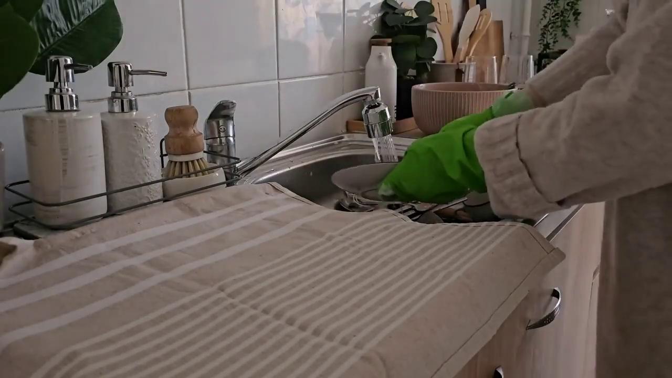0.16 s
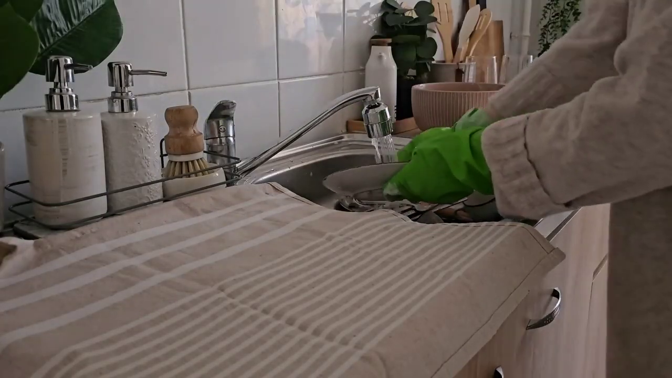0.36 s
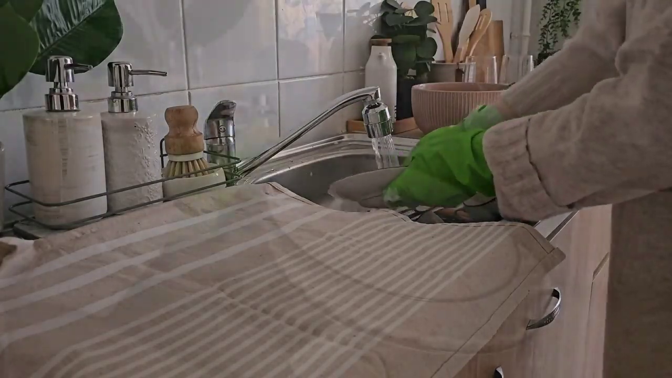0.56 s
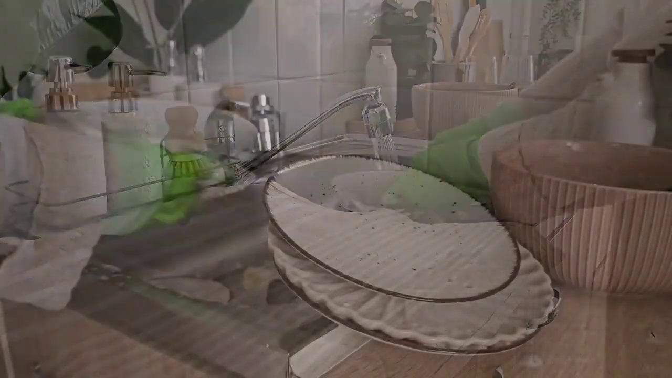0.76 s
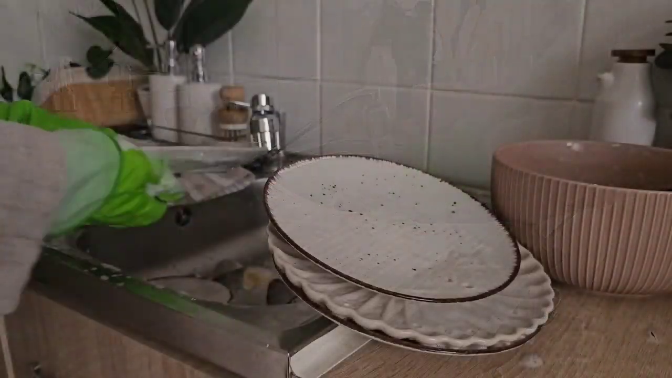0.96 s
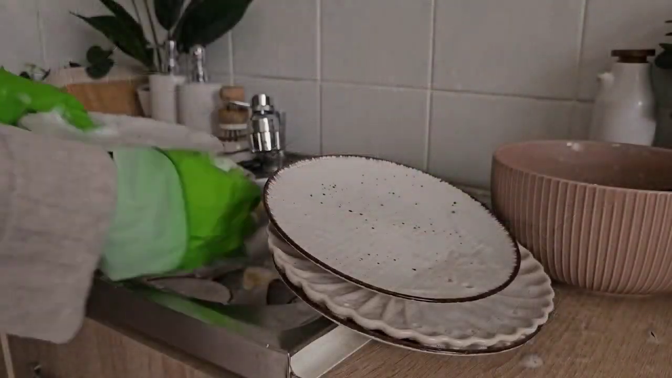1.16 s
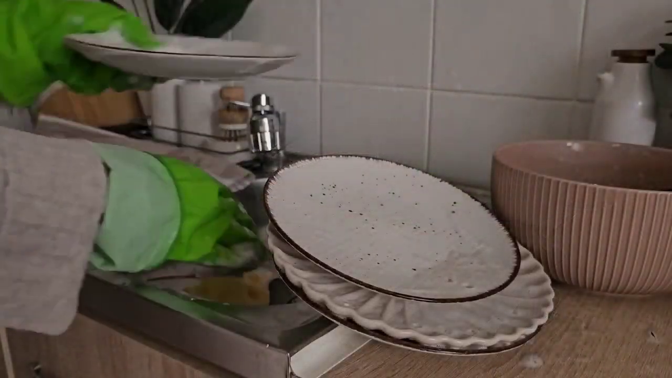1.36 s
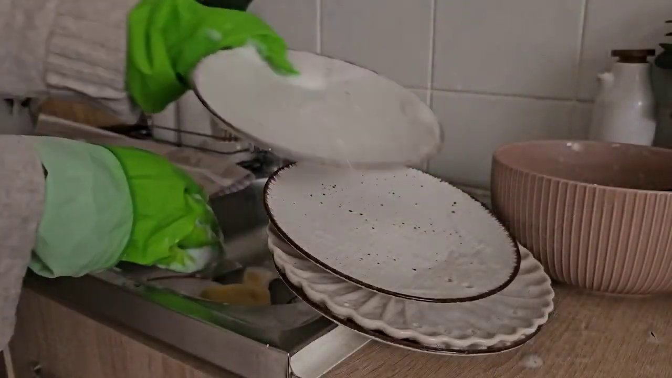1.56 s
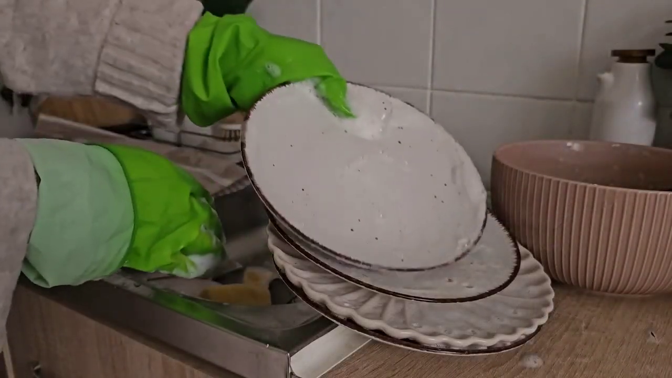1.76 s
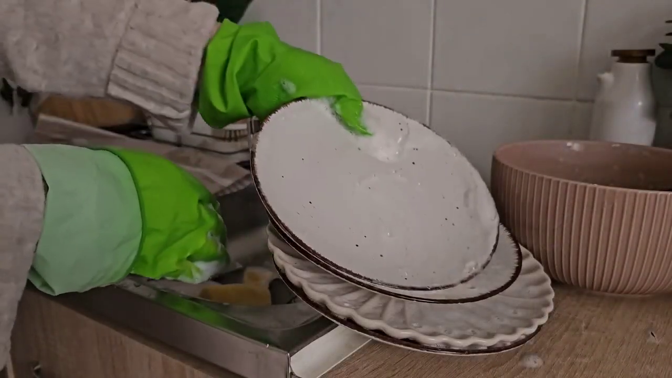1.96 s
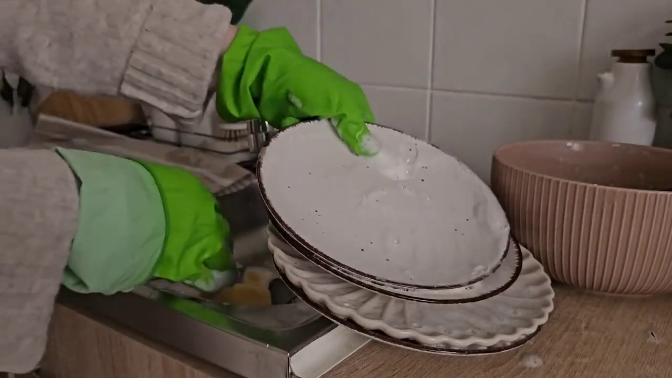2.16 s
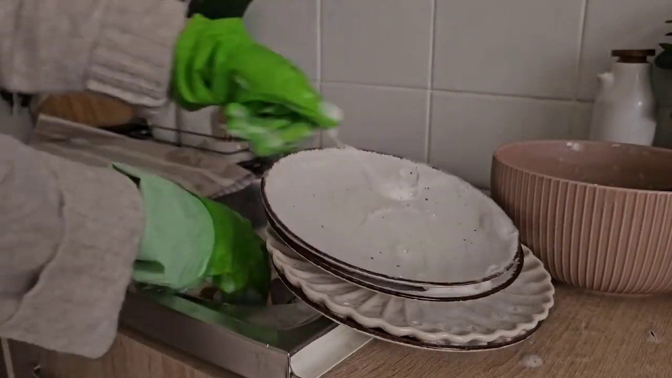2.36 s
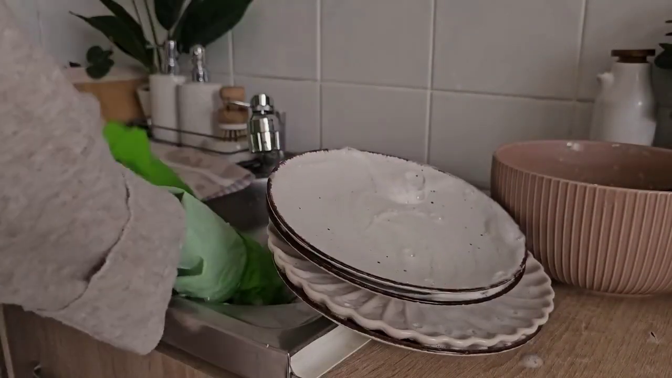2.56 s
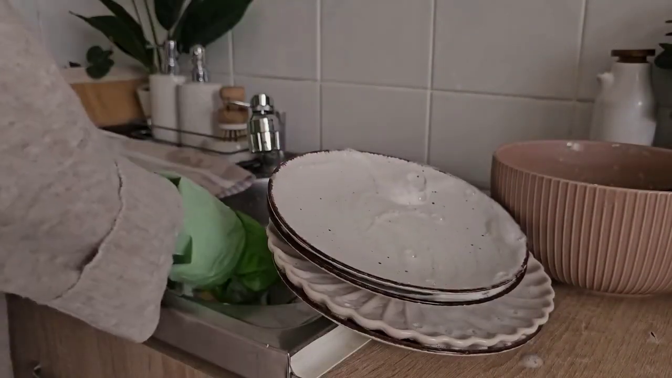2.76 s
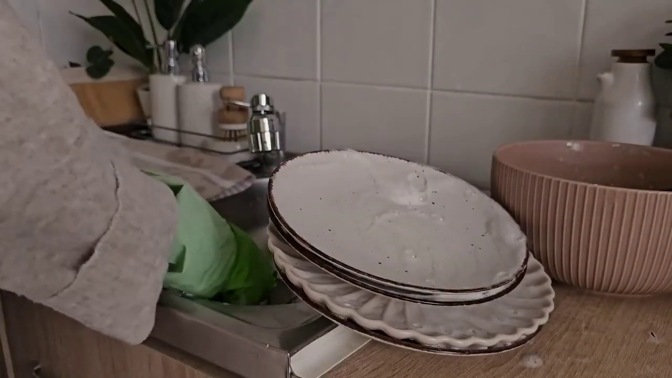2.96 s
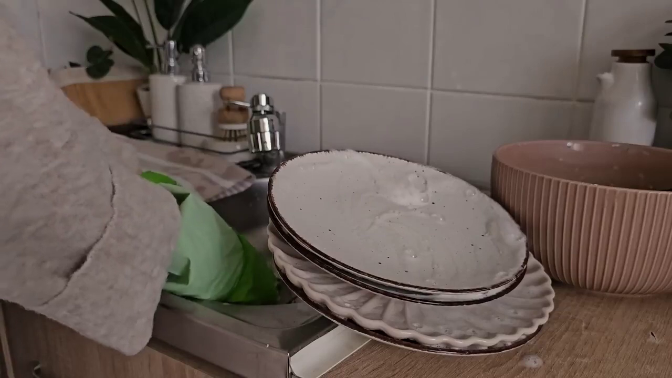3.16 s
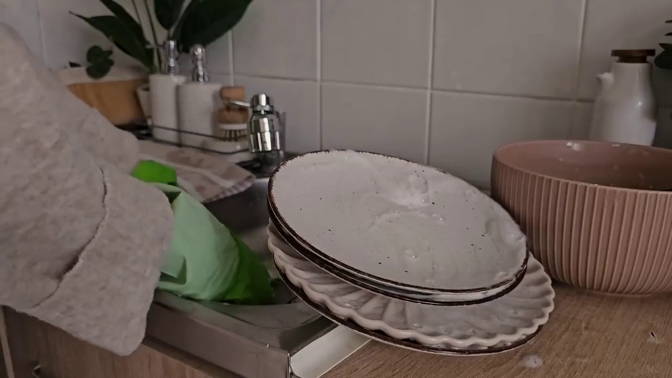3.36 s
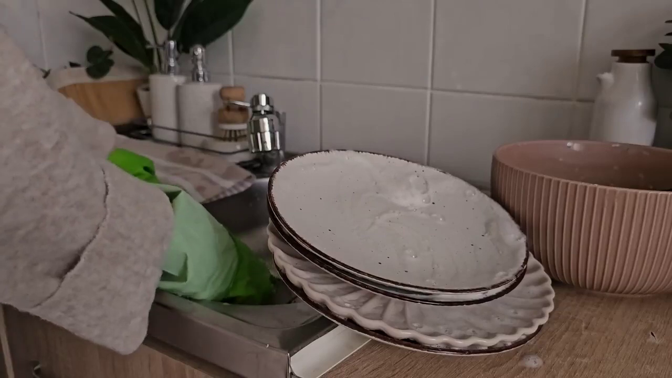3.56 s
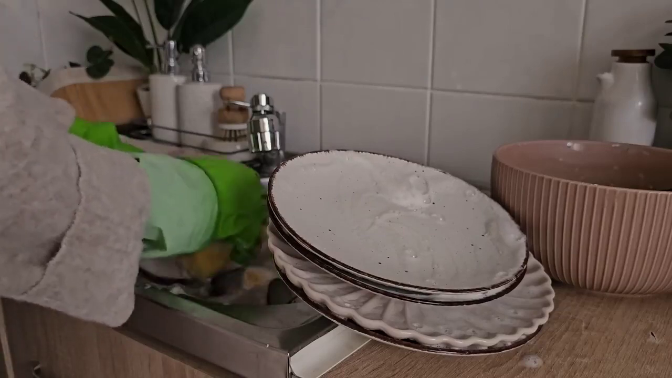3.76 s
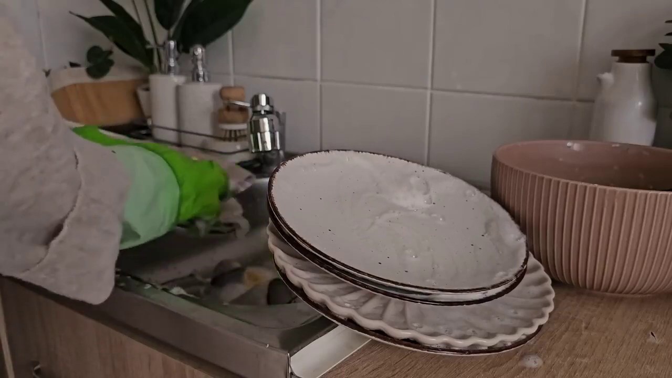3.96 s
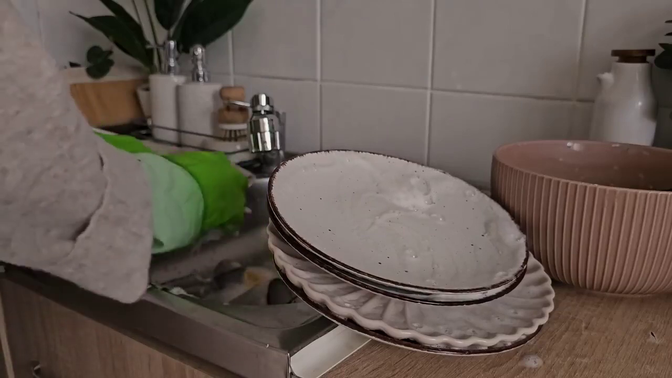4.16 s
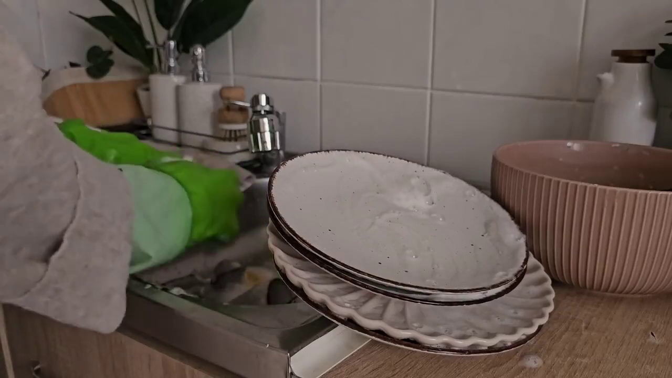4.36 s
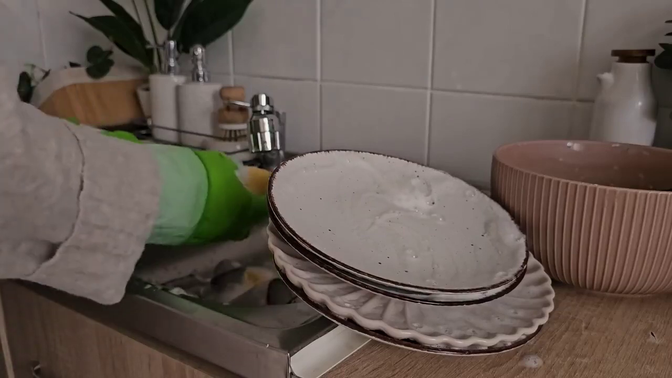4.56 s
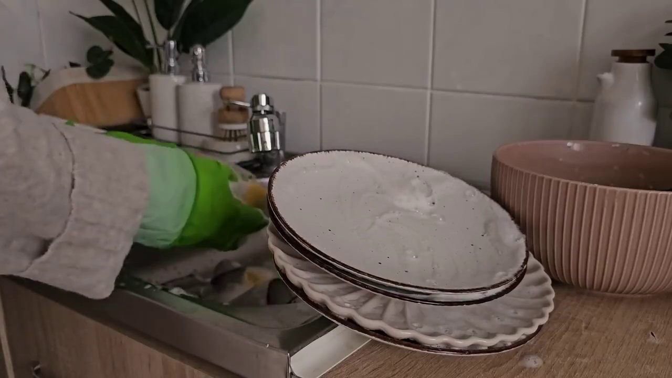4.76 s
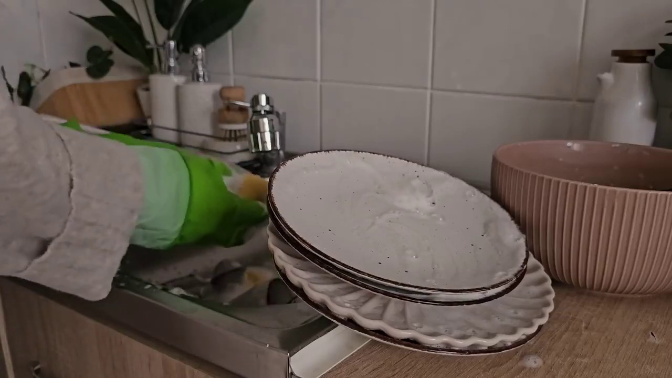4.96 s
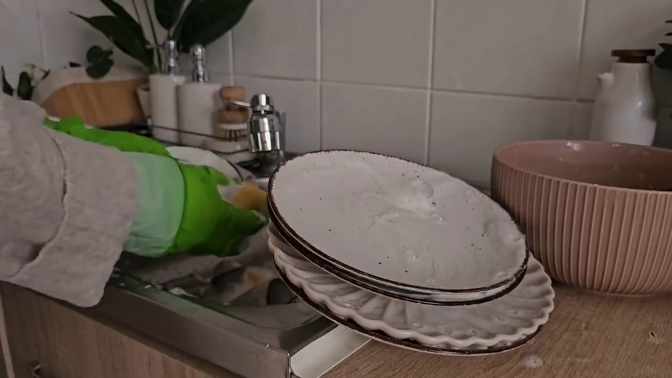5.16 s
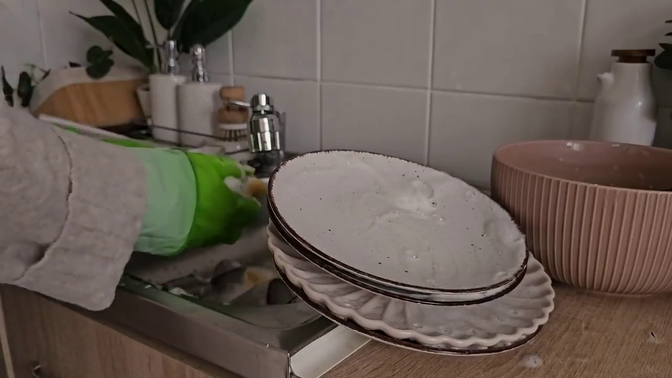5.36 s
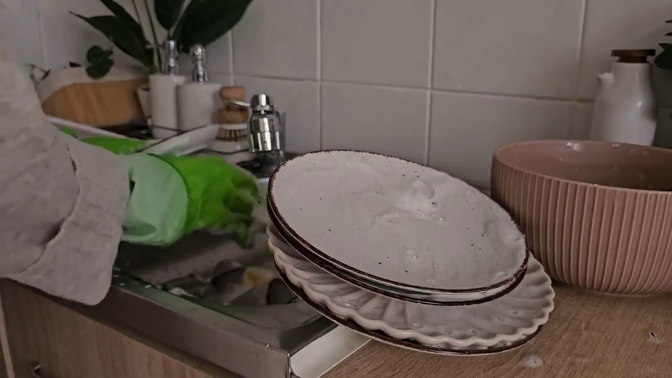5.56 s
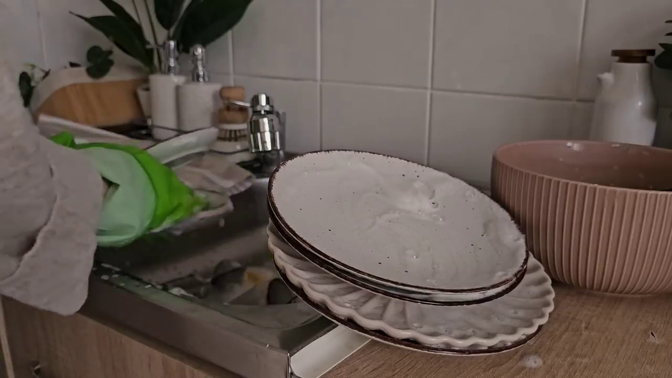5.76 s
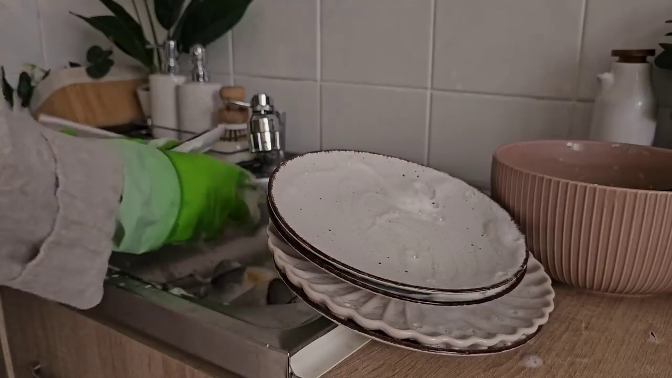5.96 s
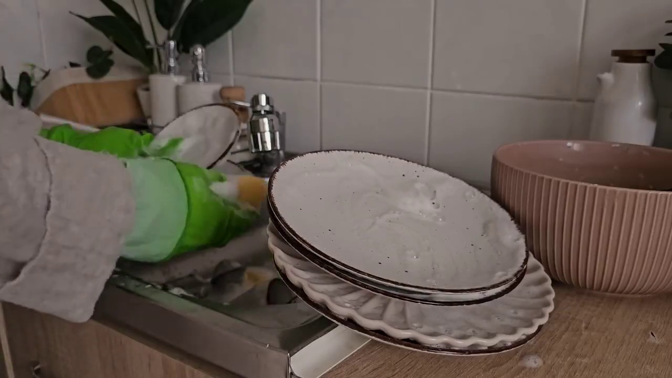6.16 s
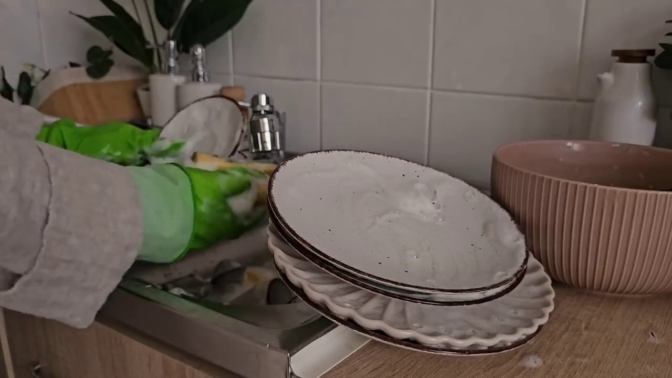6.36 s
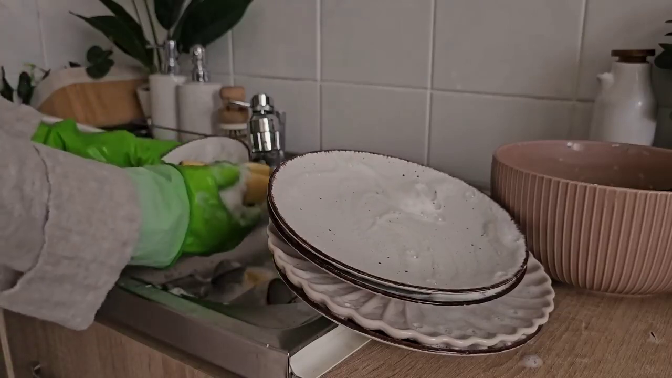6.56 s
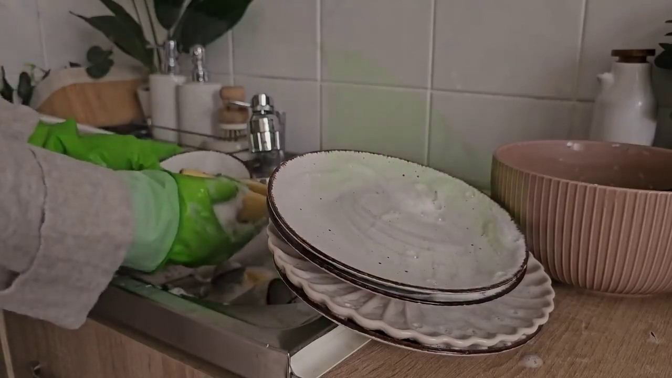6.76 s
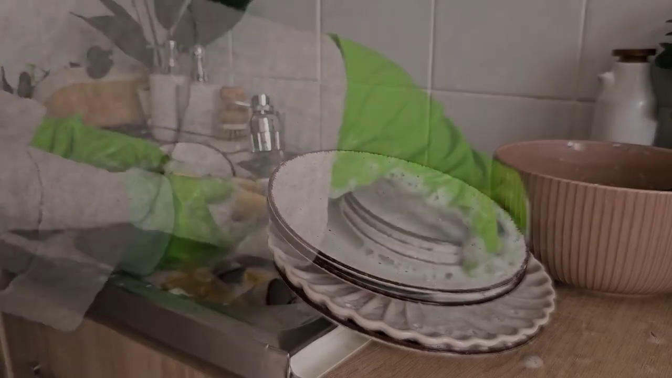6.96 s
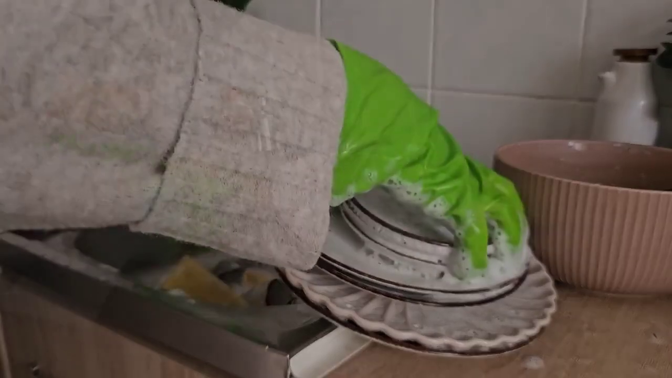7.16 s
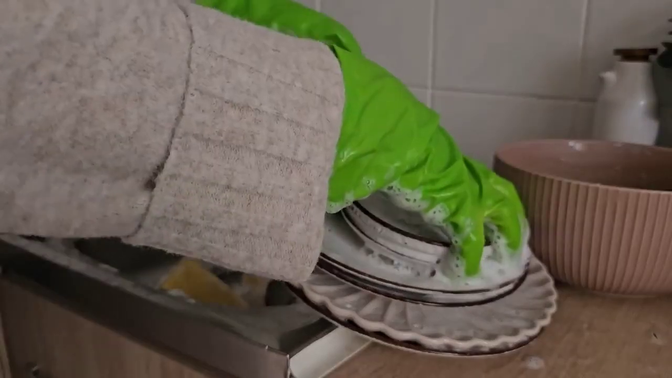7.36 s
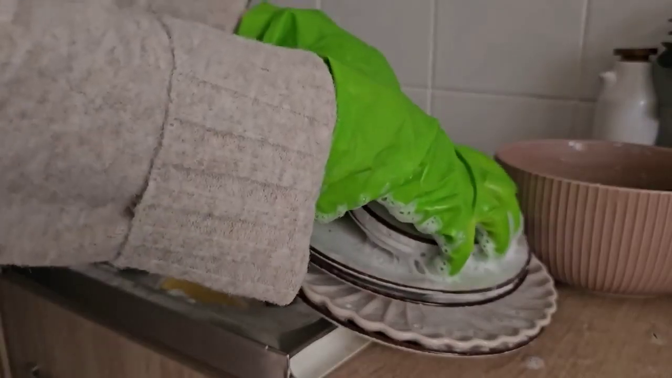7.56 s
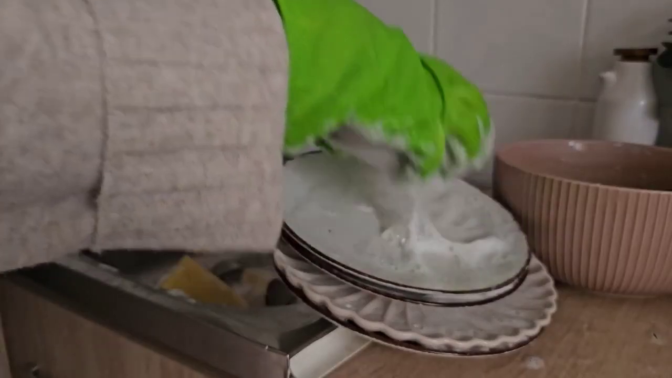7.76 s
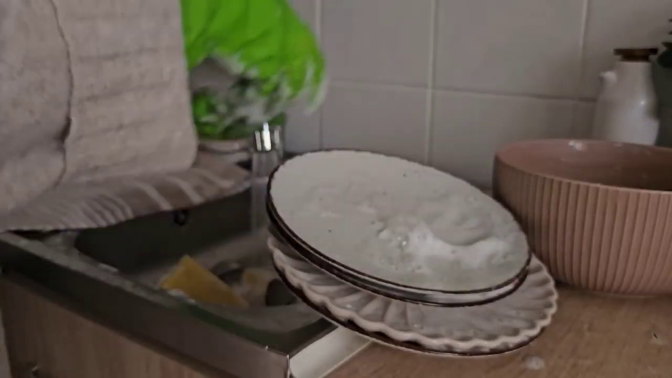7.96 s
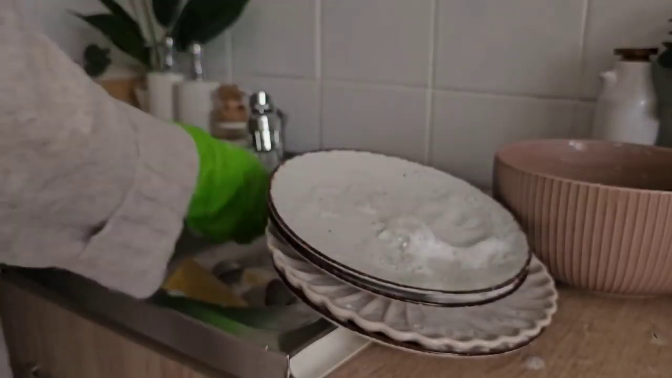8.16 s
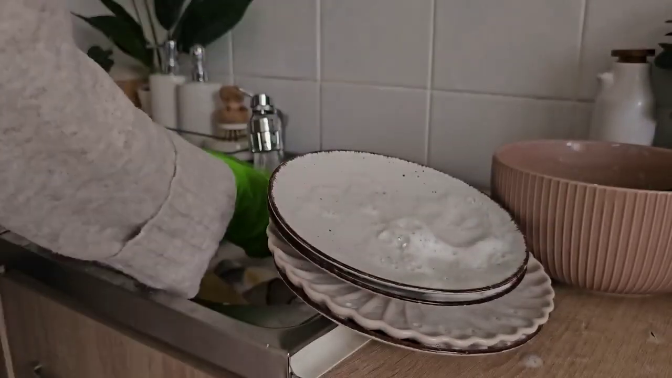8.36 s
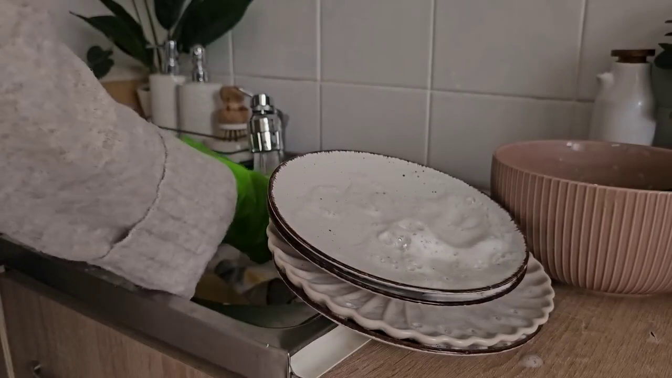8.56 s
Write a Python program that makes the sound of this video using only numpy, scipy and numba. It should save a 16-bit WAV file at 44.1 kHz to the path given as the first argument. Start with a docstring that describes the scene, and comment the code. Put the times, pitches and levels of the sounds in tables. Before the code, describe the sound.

Dishwashing by hand at a steel basin, heard close with a short tiled-room echo. Water swishes gently under sponge strokes. Two hard ceramic impacts boom through the worktop early on, then smaller, ringing dish clinks. A near-quiet stretch holds faint taps and a short glove squeak. A saucer clinks brightly and knocks softly several times; swelling suds, rubbing and a few rising drips finish it.

```python
"""Gloved hands wash dishes in a steel sink, close to a two-port microphone in a tiled kitchen.
Over sloshing, fizzing water (shaped noise, ringing bubbles) and rubbing strokes (grainy noise), plates
are set on a stack, a dish clinks, then come dull taps and a saucer's clinks: blows make pitches ring and
die away, with a crack. Worktop and basin boom under many of them; a glove squeaks (short tones) midway.
Near the end, after the last clinks, strokes, foam bursts and drips (short rising tones) remain."""
import sys
import numpy as np
from scipy import signal
from scipy.fft import rfft, irfft, next_fast_len
from scipy.io import wavfile
from scipy.ndimage import uniform_filter1d
from numba import njit

SR = 44100
rng = np.random.default_rng(int(sys.argv[2]) if len(sys.argv) > 2 else 0)


def level_to_linear(level):
    """Convert decibel levels to linear amplitude factors, elementwise."""
    exponent = np.asarray(level, float) / 20
    return 10 ** exponent


def generate_wav(sig):
    """Save sig (samples, or channels by samples) to the path in sys.argv[1] as 16-bit PCM at SR."""
    pcm = np.round(np.clip(np.atleast_2d(sig).T, -1, 1) * 32767).astype(np.int16)
    wavfile.write(sys.argv[1], SR, pcm)


N = 379260  # length in samples

# plates set on a stack, and faint ticks between: t/s, peak level/dB, loudest f/Hz,
# treble tilt/dB (before even_db), free ring (0-1)
STACK_BLOWS = [(0.714, -28, 3900, -2, 0.08), (1.301, -35.5, 2160, -34, 0.08),
               (1.784, -51.5, 2160, -16, .06), (1.797, -50, 2160, -8, .06), (1.81, -50.5, 2160, -3, .06),
               (1.863, -8.5, 4340, -10, 0.18), (1.88, -17, 1045, -11, 0.5), (2.023, -11, 1056, -32, 0.12),
               (2.027, -18, 2560, -22, .3), (2.035, -19, 1045, -39, .2), (2.06, -19, 1348, -16.5, 0.2),
               (2.077, -31.5, 2534, -20.5, .3), (2.294, -44.5, 2534, -17.5, .2),
               (2.341, -39, 3395, -23.5, .5), (2.372, -2, 1213, -17, 0.25), (2.386, -5, 3958, -14, 0.35),
               (2.42, -13.5, 2162, -16, .6), (2.644, -22, 1436, -38, 0.05), (2.665, -28, 2150, -17.5, 0.53),
               (2.701, -30.5, 2160, -3, 0)]
# clinks of a dish: t/s, peak level/dB, loudest f/Hz, treble tilt/dB (before even_db), free ring (0-1)
DISH_BLOWS = [(2.93, -33.5, 2850, -3, 0.081), (2.981, -26, 4300, -34, 0.62), (2.993, -20, 2225, -44, 0.47),
              (3.103, -31, 2460, -47, 0.089), (3.197, -39, 3910, -38, 0.25),
              (3.223, -41.5, 2225, -37, 0.11), (3.378, -42, 1230, -35, 0.99),
              (3.44, -24.5, 2860, -70.5, 0.17), (3.501, -34.5, 1240, -11, 0.087),
              (3.518, -24, 2260, -12, 0.023), (3.765, -14, 5370, -12, 0.58),
              (3.978, -38.5, 1200, -25, 0.069)]
# clinks of a saucer, and a few dull taps before them: t/s, peak level/dB, loudest f/Hz,
# treble tilt/dB (before even_db), free ring (0-1)
TAPS_AND_SAUCER_BLOWS = [(4.328, -33.5, 1210, -4, 0.095), (4.559, -40, 1230, -39, .3),
                         (4.626, -48, 1380, -15, 0.32), (4.751, -40, 2080, -20, 0.065),
                         (4.903, -49, 1158, -34, 0.18), (5.072, -52, 1180, -54, .45),
                         (5.129, -38.5, 930, -40, 0.1), (5.5, -48, 1490, -35, 0.081),
                         (5.695, -39.5, 1210, -6, 0.091), (6.289, -13.5, 4900, 6, 0.21),
                         (6.296, -32, 5130, 2, 0.35), (6.309, -10, 1900, -0.5, 0.29),
                         (6.352, -28.5, 1490, -12, 0.64), (6.436, -26.5, 1800, -26, 0.089),
                         (6.449, -28.5, 1580, -9, 0.18), (6.507, -24.5, 1190, -18, 0.37),
                         (6.56, -27.5, 1240, -37, 0.5), (6.687, -17, 980, -27, 0.5),
                         (6.725, -26.5, 950, -58, 0.1), (6.917, -33.5, 940, -54, 0.16),
                         (6.977, -36, 950, -36, 0.31), (7.043, -32, 960, -28, 0.085),
                         (7.164, -25, 965, -25, 0.21), (7.226, -32, 1060, -26, 0.13),
                         (7.468, -28, 860, -48, 0.034), (7.563, -37, 740, -43, 0.35)]
# knocks on worktop and basin: t/s, peak level/dB, loudest f/Hz, treble tilt/dB (before even_db), free ring (0-1)
WORKTOP_BLOWS = [(0.714, -23, 104, 10, 0.08), (1.347, -26, 328, -10, 0.54), (1.377, -25, 200.5, -11, 0.6),
                 (1.398, -35, 196, -28, 0.6), (1.866, -14, 511, -13, 0.93), (2.022, -17, 586, 12, 0.98),
                 (2.065, -18, 191.7, 0, 0.62), (2.37, -10, 523, -8, 0.57), (2.395, -17, 483, -5, 0.8),
                 (2.43, -14.5, 268, 3.5, 0.66), (2.613, -18, 176, 2, 1), (2.672, -19.5, 129, -2, 0.11),
                 (2.914, -29, 367, -8, 0.1), (2.99, -27.5, 294, -10.5, 0.86), (3.103, -20, 325, -8, 0.16),
                 (3.117, -23.5, 256, 4, 0.6), (3.199, -31, 372, -15.5, 0.8), (3.439, -28.5, 368, 8, 0.3),
                 (3.495, -18, 306, -22, 0.4), (3.53, -21.5, 211, -23, 0.04), (3.769, -28.5, 106, -27, 0.66),
                 (4.256, -39, 127, -24, .7), (4.332, -29.5, 466, -11, 0.32),
                 (4.368, -36.5, 61.3, -12, 0.28), (7.104, -33.5, 200, 6, 0.37),
                 (7.124, -29.5, 181, -8, 0.24), (7.137, -27.5, 474, 0, 0.25),
                 (7.165, -33.5, 121, -30, 0.35), (7.465, -27.5, 530, 4, 0.23), (7.561, -24, 470, 34, 0.2),
                 (7.589, -30.5, 215, -24, 1)]
# how differently the two ports hear: f/Hz, side over mid (ratio)
PORT_DIFFERENCE = [(60, 0.15), (250, 0.32), (1000, 1), (3000, 0.88), (16000, 1)]
PORT_SIGN = np.array([[1], [-1]])  # the side signal is added at one port, subtracted at the other


def on_log(hz, table):
    """Reads a (Hz, value) table on a log-frequency axis."""
    at, value = np.transpose(table)
    return np.interp(np.log(np.maximum(hz, 1)), np.log(at), value)


def unit(x):
    """Scales to rms 1."""
    return x / np.sqrt(np.mean(x ** 2))


def colour(x, table):
    """Shapes a signal by a (Hz, dB) spectrum."""
    size = next_fast_len(x.shape[-1])
    gain = level_to_linear(on_log(np.fft.rfftfreq(size, 1 / SR), table))
    return irfft(rfft(x, size) * gain, size)[..., :x.shape[-1]]


def walk(rate):
    """Random levels that glide to a new value every 1 / rate s; spread a little under 1."""
    hold = int(SR / rate)
    steps = np.repeat(rng.standard_normal(N // hold + 1), hold)
    return uniform_filter1d(steps, hold)[:N]


def wide(mid, side):
    """Two ports hear the bass nearly alike and the treble apart."""
    share_db = [(hz, 20 * np.log10(max(share, 1e-3))) for hz, share in PORT_DIFFERENCE]
    return mid + PORT_SIGN * colour(side, share_db)


def house():
    """A low murmur of the building: a narrow band of noise, the same at both ports."""
    band = signal.butter(2, [45, 70], "band", fs=SR, output="sos")
    return unit(signal.sosfilt(band, rng.standard_normal(N))) * level_to_linear(-62.5)


def kitchen(x):
    """The echo of a tiled room: a diffuse noise tail whose pitch bands die away at different speeds."""
    # how long the room takes to fade by 60 dB: f/Hz, T60/s
    room_t60 = [(100, 0.5), (500, 0.28), (2000, 0.41), (8000, 0.17), (16000, 0.52)]
    t = np.arange(SR * 3 // 4) / SR
    tail = 0
    for hz in 60 * 2. ** np.arange(8):  # one octave at a time
        octave = signal.butter(2, [hz, 2 * hz], "band", fs=SR, output="sos")
        band = signal.sosfilt(octave, rng.standard_normal((2, len(t))))
        t60 = max(on_log(np.sqrt(2) * hz, room_t60), .05)
        tail = tail + band * np.exp(-np.log(1000) * t / t60)
    tail = wide(*tail) * np.clip(t / 0.0017 - .3, 0, 1)  # the echo starts after half a millisecond
    return signal.fftconvolve(x.mean(axis=0)[None], unit(tail) / np.sqrt(len(t)), axes=1)[:, :N]


def spray(rate, spread_db):
    """Noise with drops in it: sparse clicks of very uneven size, each smeared over a few samples."""
    falls = rng.random((2, N)) < rate / SR
    size_db = spread_db * np.minimum(rng.exponential(size=(2, N)), 2)
    drops = falls * level_to_linear(size_db) * rng.standard_normal((2, N))
    drops = signal.lfilter([1], [1, -.6], drops)
    return rng.standard_normal((2, N)) + drops


def flow(table, db, rate, spread_db, flicker_db, quick, count):
    """Water noise in overlapping bands that swell together and flicker alone."""
    size = next_fast_len(N)
    whole = rfft(colour(spray(rate, spread_db), table), size)
    # place counts bands up the log-frequency axis, 0 to count
    place = on_log(np.fft.rfftfreq(size, 1 / SR), [(table[1][0], 0), (table[-2][0], count)])
    swell = walk(quick / 2)
    total = 0
    for k in range(count + 1):
        band = irfft(whole * np.clip(1 - abs(place - k), 0, 1), size)[:, :N]
        total = total + band * level_to_linear(flicker_db * (swell + walk(quick)))
    mid, side = total
    return unit(wide(mid, side)) * level_to_linear(db)


def trail(db, hits, under_db, rise_s, fall_s):
    """Adds to a level the noise that swells just after each blow and dies away."""
    t, kicks = np.arange(SR) / SR, np.zeros(N)
    kicks[[int(h[0] * SR) for h in hits]] = [level_to_linear(h[1] + under_db) ** 2 for h in hits]
    shape = ((1 - np.exp(-t / max(rise_s, 1e-3))) * np.exp(-t / max(fall_s, 1e-2))) ** 2
    added = np.abs(signal.fftconvolve(kicks, shape / shape.max())[:N])
    return 10 * np.log10(level_to_linear(db) ** 2 + added)


def bubbles(slosh_db, rate, over_db):
    """Trapped air rings for a few cycles and rises in pitch as it nears the surface; a few drips stand out."""
    # drips that stand out: t/s, start level/dB, starting f/Hz
    drips = [(7.832, -32.5, 1310), (7.843, -42, 1390), (7.854, -39, 1430), (7.93, -43, 2730),
             (8.118, -42.5, 2270), (8.149, -43, 2150), (8.226, -42, 1300)]
    fade_turns, glide = 6, .004  # cycles in which a bubble fades to about a third; rise per cycle
    chance = rng.random((int(rate * N / SR), 3))
    drip_s, drip_db, drip_hz = np.transpose(drips)
    s = np.append(chance[:, 0] * N / SR, drip_s)
    hz = np.append(1000 * 4.5 ** chance[:, 1], drip_hz)
    bubble_db = slosh_db[(chance[:, 0] * N).astype(int)] + over_db - 14 * chance[:, 2]
    db = np.append(bubble_db, drip_db)
    out, t = np.zeros(N + 2048), np.arange(2048) / SR
    for start, pitch, level in zip((s * SR).astype(int), hz, level_to_linear(db)):
        turns = pitch * t
        tone = np.sin(2 * np.pi * turns * (1 + glide * np.minimum(turns, 40)))
        out[start:start + len(t)] += level * np.exp(-turns / fade_turns) * tone
    return out[:N]


def water():
    """The basin rumbles, water sloshes, foam fizzes; knocks and clinks leave a trail of the same noise."""
    # levels of water and of some noise left by loud blows, before the added trails:
    # t/s, rumble level/dB, slosh level/dB, foam fizz level/dB
    noise_levels = [(0.0, -50.5, -54.5, -60), (0.84, -53.5, -54, -58), (1.15, -63, -61, -67.5),
                    (1.82, -72.5, -72, -86), (2.01, -53, -68.5, -88), (2.331, -56, -57, -77.5),
                    (2.4, -48, -42.5, -68), (2.56, -37.5, -45.5, -74), (2.75, -54, -59, -64),
                    (3.16, -46.5, -50.5, -60.5), (3.74, -59, -65, -73), (3.9, -54.5, -54.5, -62.5),
                    (4.482, -59, -54, -63.5), (4.91, -68, -66.5, -84.5), (6.35, -63.5, -56.5, -64),
                    (6.47, -57.5, -42, -80), (6.8, -56.5, -60, -58.5), (7.71, -50, -52, -49),
                    (8.6, -53, -55.5, -58)]
    # spectrum of the rumble in the basin: f/Hz, level/dB
    rumble_colour = [(15, -43), (25, -17.5), (54, 4), (81, -10), (249, 3.5), (349, -8.5), (379, -0.5),
                     (537, -2.5), (700, -6.5), (910, -25.5), (1540, -120)]
    # spectrum of the sloshing: f/Hz, level/dB
    slosh_colour = [(260, -40), (450, -26), (600, -11), (808, -5.5), (1180, -3.5), (1240, 0), (2220, -5.5),
                    (7000, -19), (9100, -57.5), (15400, -120)]
    # spectrum of the foam: f/Hz, level/dB
    fizz_colour = [(2650, -15.5), (4500, -6.5), (6360, -11), (9380, -6.5), (10700, -14), (15100, -12.5),
                   (16000, -14.5), (16400, -8)]
    s, *columns = np.transpose(noise_levels)
    rumble_db, slosh_db, fizz_db = (np.interp(np.arange(N) / SR, s, c) for c in columns)
    clinks = STACK_BLOWS + DISH_BLOWS + TAPS_AND_SAUCER_BLOWS
    boomy_db = trail(rumble_db, WORKTOP_BLOWS, under_db=-20.5, rise_s=0.019, fall_s=0.059)
    splashy_db = trail(slosh_db, clinks, under_db=-21.5, rise_s=0.039, fall_s=0.033)
    # rate: drops per second; quick: flickers per second
    rumble = flow(rumble_colour, boomy_db, rate=84, spread_db=1.7, flicker_db=0.73, quick=9.6, count=5)
    slosh = flow(slosh_colour, splashy_db, rate=490, spread_db=5.5, flicker_db=2.9, quick=30, count=8)
    fizz = flow(fizz_colour, fizz_db, rate=590, spread_db=2.3, flicker_db=1.9, quick=25, count=6)
    return rumble + slosh + fizz + bubbles(slosh_db, rate=70, over_db=5)


def strokes_and_foam():
    """Rubbing and short bursts of foam: grainy noise around one pitch, with an uneven level."""
    # strokes of sponge and glove (centres below about 7500 Hz), and short bursts of foam fizz
    # (higher centres): t/s, length/s, level/dB, centre f/Hz, width/octaves
    bursts = [(0.053, 0.15, -49, 2430, 1.43), (0.21, 0.19, -51, 2160, 1.14),
              (0.228, 0.15, -50.5, 574, 0.19), (0.55, .11, -53, 2190, 1.4),
              (0.969, 0.09, -54.5, 1920, 1.54), (1.31, 0.14, -49, 2240, 1.72), (2.88, 0.31, -49, 4620, 1.4),
              (3.265, 0.064, -54.5, 8400, 0.53), (4.256, 0.024, -54.5, 2510, 0.84),
              (5.225, 0.033, -70, 11100, 0.7), (5.447, 0.27, -63.5, 2860, 1.42),
              (5.667, 0.15, -53, 1280, 1.36), (5.697, 0.144, -55, 280, 0.54),
              (7.39, 0.081, -57, 7800, 0.19), (7.497, 0.16, -50, 1680, 1.34),
              (7.828, 0.032, -52, 8550, .35), (7.95, 0.077, -51, 8900, 0.3),
              (8.114, 0.053, -50.5, 8550, 0.38), (8.2, 0.083, -49, 7200, 1.3)]
    out, grain, waver = np.zeros((2, N)), spray(2500, 6.0), level_to_linear(1.5 * walk(70))
    for s, length, db, hz, octaves in bursts:
        span = slice(int(s * SR), int((s + length) * SR))
        reach = 2 ** max(octaves, .05)
        hump = [(hz / reach ** 2, -30), (hz / reach, -6), (hz, 0), (hz * reach, -6), (hz * reach ** 2, -30)]
        burst = colour(grain[:, span], hump)
        fade = signal.windows.tukey(burst.shape[1], .6)
        out[:, span] += level_to_linear(db) * unit(wide(*burst)) * waver[span] * fade
    return out


def squeaks():
    """Rubber grips and slips at a steady rate for a moment: a short tone with a weak octave."""
    # a rubber glove squeaks in steps along a wet rim: t/s, length/s, level of the main tone/dB, f/Hz
    squeak_steps = [(5.13, 0.01, -41, 914), (5.143, .018, -53, 850), (5.162, 0.018, -48, 868),
                    (5.188, 0.0085, -46, 990), (5.195, .006, -49, 1010), (5.23, 0.0067, -52, 976),
                    (5.236, 0.0067, -50, 1120), (5.24, 0.0092, -48, 1210)]
    octave_db = -15
    out = np.zeros(N)
    for s, length, db, hz in squeak_steps:
        turns = hz * np.arange(int(length * SR)) / SR + rng.random()
        tone = np.sin(2 * np.pi * turns) + level_to_linear(octave_db) * np.sin(4 * np.pi * turns)
        start = int(s * SR)
        out[start:start + len(turns)] += level_to_linear(db) * tone * signal.windows.tukey(len(turns), .7)
    return out


@njit
def ring(push, poles, gains, size):
    """Decaying modes driven by a push; each port hears each mode with its own phase."""
    out = np.zeros((2, size))
    for m in range(len(poles)):
        z = 0j
        for i in range(size):
            z = z * poles[m] + (push[i] if i < len(push) else 0.)
            out[0, i] += (gains[0, m] * z).imag
            out[1, i] += (gains[1, m] * z).imag
    return out


def strike(hits, modes, rattle_s, low_hz, crack_db, favour_db, even_db, split):
    """Each blow is a short rattle of contacts that rings the modes; similar noise is heard as a crack."""
    # spectrum that softens the crack's treble: f/Hz, level/dB
    crack_top = [(4000, 0), (8000, -11), (16000, -22)]
    scatter_db = 3.5  # random spread of the mode levels from blow to blow
    hz, db, t60 = np.repeat(modes, 3, axis=1)
    # an uneven shape splits each mode into close partners
    hz = hz * (1 + split * np.resize([0, -1, 1.6], len(hz)))
    db = db + np.resize([0, -6, -9], len(hz))
    size, t = SR // 3, np.arange(4096) / SR
    waves = np.exp(-2j * np.pi * np.outer(hz, t))
    out = np.zeros((2, N + size))
    for s, peak_db, loud_hz, treble_db, free in hits:
        noise, chance = rng.standard_normal((3, len(t))), rng.standard_normal((2, len(hz)))
        # the rattle: noise whose level jumps every 64 samples as it dies away
        contacts = np.repeat(level_to_linear(3.0 * rng.standard_normal(len(t) // 64)), 64)
        push = noise * contacts * np.exp(-t / max(rattle_s, 1e-3)) * np.minimum(t / 0.0002, 1)
        # gloves, water and the plate below damp the ring
        ring_s = np.clip(free * t60, .01, .5)
        poles = np.exp(2j * np.pi * hz / SR - np.log(1000) / (ring_s * SR))
        # a soft contact is dull, and the spot that is struck favours one pitch
        tilt_db = treble_db - even_db
        tone = [(low_hz / 12, -70), (low_hz / 3, -30), (low_hz, 0), (3 * low_hz, 0),
                (9 * low_hz, tilt_db), (30 * low_hz, tilt_db - 18.5), (200 * low_hz, tilt_db - 45.5)]
        near = np.exp(-.5 * (np.log(hz / loud_hz) / 0.043) ** 2)
        turn = np.arctan(on_log(hz, PORT_DIFFERENCE)) * np.sign(chance[1])
        mode_db = db + on_log(hz, tone) + favour_db * near + scatter_db * chance[0]
        gains = level_to_linear(mode_db) * np.exp(1j * PORT_SIGN * turn)
        # evens out how strongly the random push happens to drive each mode
        share = np.abs(waves @ push[0])
        gains /= share + share.mean() / 4
        sound = ring(push[0], poles, gains, size)
        sound /= np.abs(sound).max()
        crack = colour(wide(push[1], push[2]), tone)
        crack = colour(crack, [(loud_hz / 1.6, 0), (loud_hz, 6), (loud_hz * 1.6, 0)])
        crack = colour(crack, crack_top)
        sound[:, :len(t)] += level_to_linear(crack_db) * crack / np.abs(crack).max()
        at = int(s * SR)
        out[:, at:at + size] += level_to_linear(peak_db) * sound / np.abs(sound.mean(axis=0)).max()
    # nothing radiates far below the lowest mode
    high = signal.butter(3, hz.min() / 2, "high", fs=SR, output="sos")
    return signal.sosfilt(high, out[:, :N])


def worktop():
    """Knocks make the worktop and basin boom at low pitches."""
    # modes, one row for each quantity: f/Hz, level/dB, T60 before damping/s
    worktop_modes = [(65, 108, 119, 196, 232, 255, 308, 368, 488, 545, 615, 700, 770),
                     (-6, -11, 0, -1, -2, -8, -5, -5, -2, -5, -8, -11, -16),
                     (.5, .3, .5, .5, .5, .4, .35, .3, .25, .25, .2, .2, .2)]
    return strike(WORKTOP_BLOWS, worktop_modes, rattle_s=.015, low_hz=100, crack_db=-4.0,
                  favour_db=19, even_db=-11.5, split=0.0036)


def taps_and_saucer():
    """A few dull taps, then a saucer's clinks, ring one dense set of modes."""
    # modes, one row for each quantity: f/Hz, level/dB, T60 before damping/s
    dense_modes = [(840, 953, 1210, 1486, 1884, 2202, 2326, 2735, 2998, 3420, 4387, 4890, 5180, 5346, 5470, 6164, 7790, 8419, 11260, 11770, 12320, 1060, 9150, 15000),
                   (-7, -4, -6, -3, -5, -1, -4, -4, -4, -5, -6, -7, -6, -5, -6, -10, -12, -7, -12, -14, -12, -3, -10, -8),
                   (.25, .22, .25, .25, .25, .3, .25, .3, .22, .3, .15, .3, .17, .18, .22, .19, .22, .28, .2, .2, .2, .25, .25, .3)]
    return strike(TAPS_AND_SAUCER_BLOWS, dense_modes, rattle_s=0.0087, low_hz=736, crack_db=-8,
                  favour_db=12, even_db=-14.5, split=0.0098)


def dish():
    """A dish in the basin rings when it clinks."""
    # modes, one row for each quantity: f/Hz, level/dB, T60 before damping/s
    dish_modes = [(1240, 2225, 2611, 3350, 3910, 4300, 4900, 6460, 7720, 9190, 9862, 11560, 12110, 14200, 15600),
                  (-16, -7, -14, -12, -3, -8, -4, -16, -12, -3, -4, -6, -3, -3, -2),
                  (.2, .35, .19, .2, .4, .17, .35, .14, .16, .2, .18, .17, .2, .17, .2)]
    return strike(DISH_BLOWS, dish_modes, rattle_s=.007, low_hz=1130, crack_db=-8,
                  favour_db=15, even_db=-3.5, split=0.006)


def plate_stack():
    """Plates set on a stack ring at many pitches, with faint ticks between."""
    # modes, one row for each quantity: f/Hz, level/dB, T60 before damping/s
    stack_modes = [(1045, 1125, 1184, 1348, 1580, 2162, 2534, 3395, 3958, 4300, 4613, 4813, 5114, 6003, 6400, 7960, 8557, 9500, 10460, 11140, 11650, 12310, 13440, 7640, 9750, 13700),
                   (-3, -8, -10, -8, -12, -8, -5, -10, -4, -13, -12, -7, -12, -8, -16, -9, -6, -13, -11, -14, -12, -14, -10, -10, -10, -12),
                   (.25, .2, .3, .2, .2, .35, .27, .3, .25, .25, .25, .3, .22, .35, .25, .15, .28, .12, .2, .25, .22, .14, .3, .25, .25, .3)]
    return strike(STACK_BLOWS, stack_modes, rattle_s=0.0059, low_hz=720, crack_db=-8,
                  favour_db=6, even_db=-11.5, split=0.003)


def scene():
    """Crockery, worktop, strokes, foam bursts and squeaks sound into the room over the water."""
    close = plate_stack() + dish() + taps_and_saucer() + worktop() + strokes_and_foam() + squeaks()
    return close + level_to_linear(-4.5) * kitchen(close) + water() + house()


def low_pass(x):
    """Removes everything above the highest recorded frequency."""
    return signal.sosfilt(signal.butter(12, 16510, fs=SR, output="sos"), x)


def record(dry):
    """Deep bass and the very top are filtered away."""
    no_top = signal.sosfilt(signal.ellip(8, .2, 70, 15900, fs=SR, output="sos"), dry)
    mix = signal.sosfilt(signal.butter(6, 52, "high", fs=SR, output="sos"), no_top)
    return low_pass(mix)


dry = scene()
out = record(dry)
generate_wav(out)
```